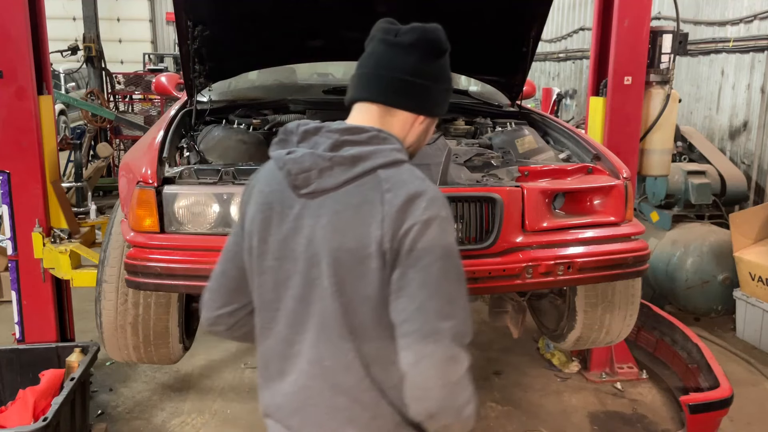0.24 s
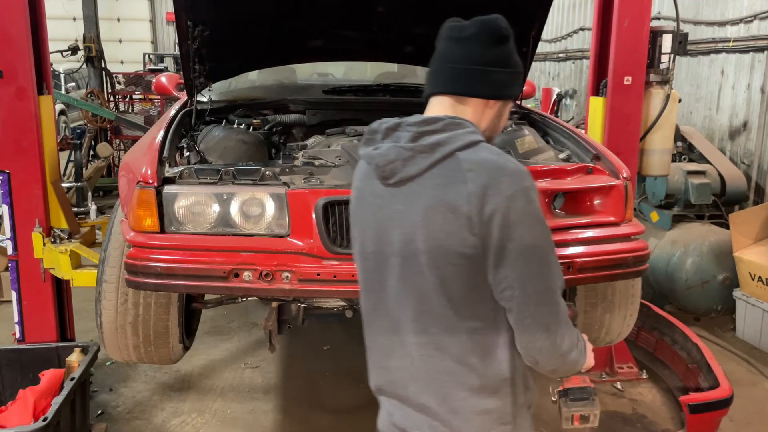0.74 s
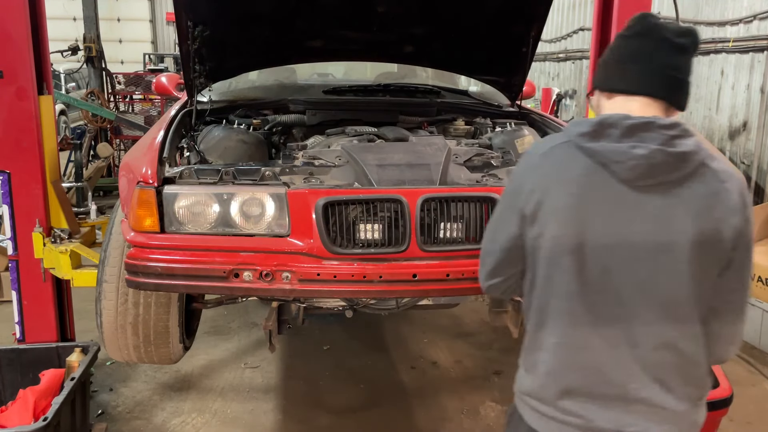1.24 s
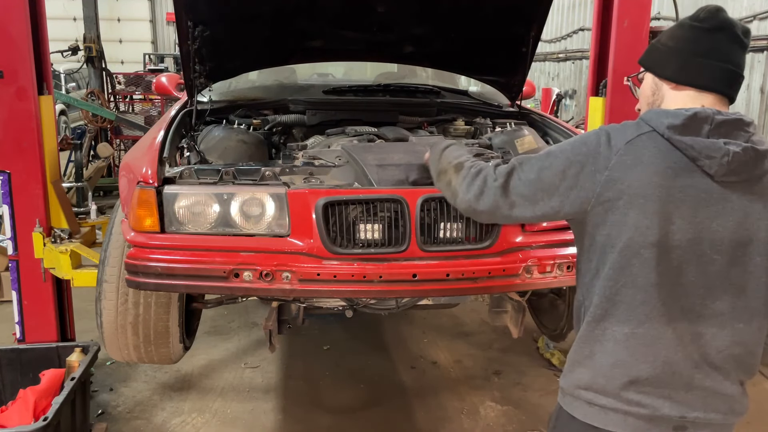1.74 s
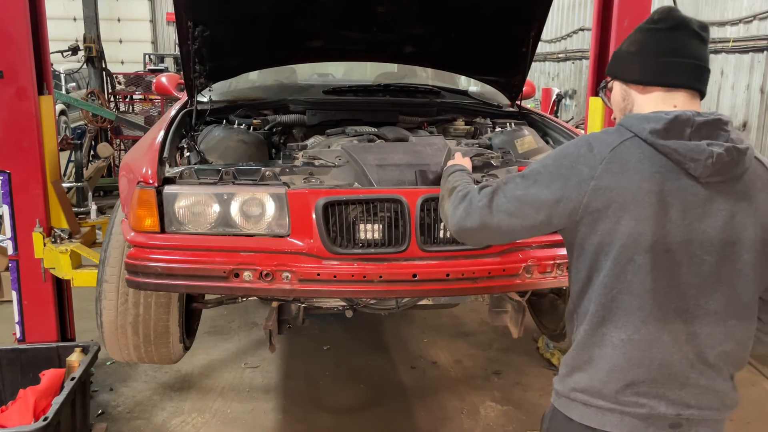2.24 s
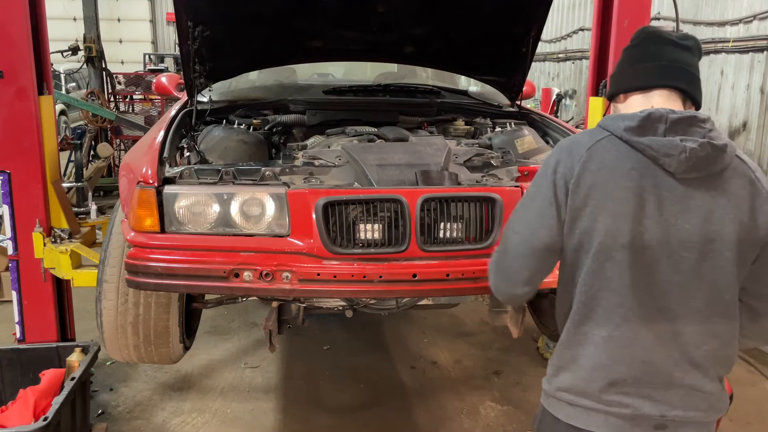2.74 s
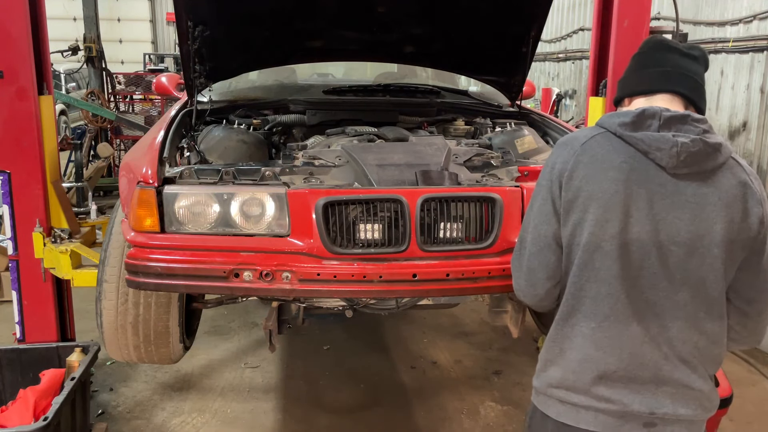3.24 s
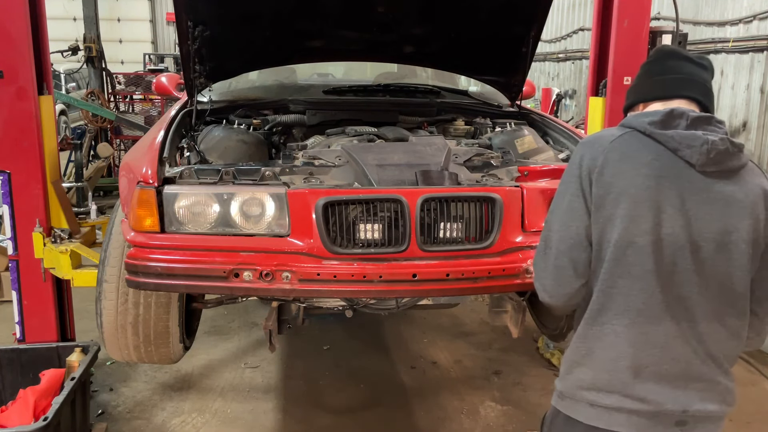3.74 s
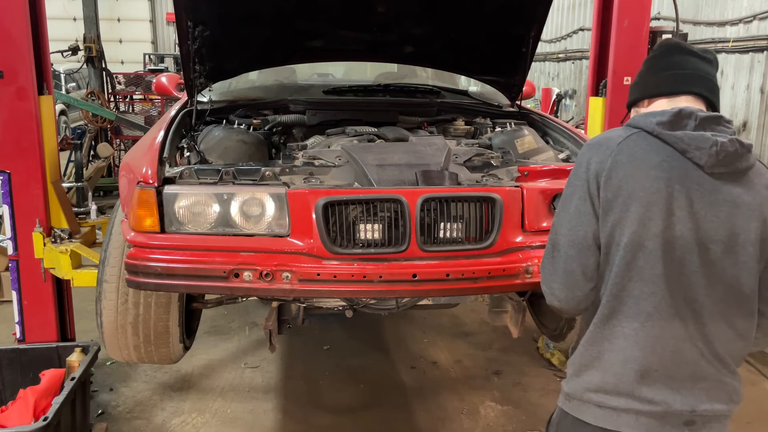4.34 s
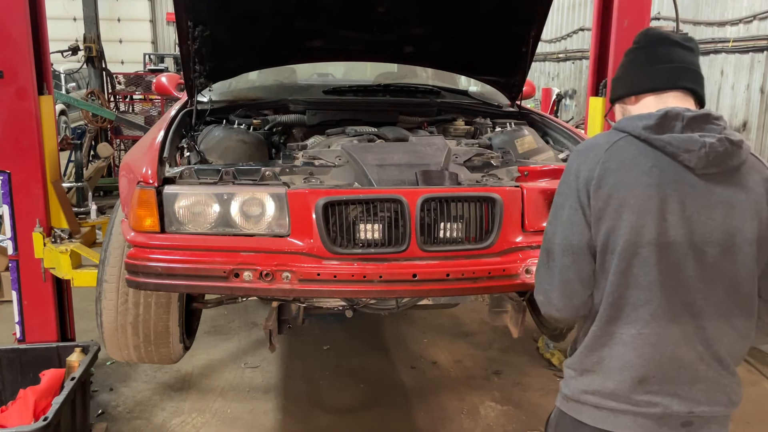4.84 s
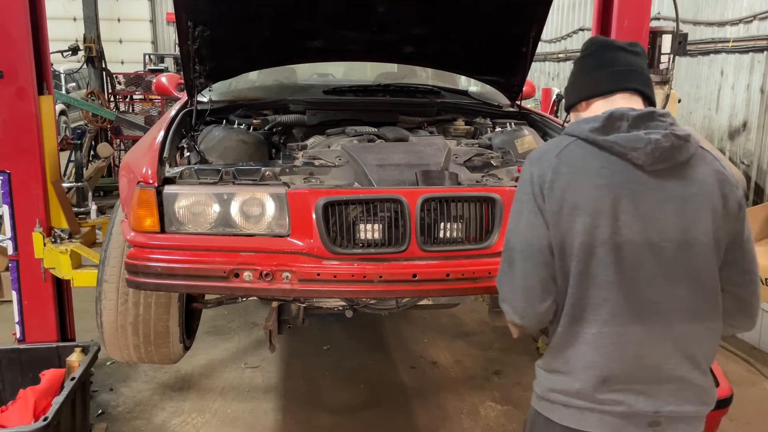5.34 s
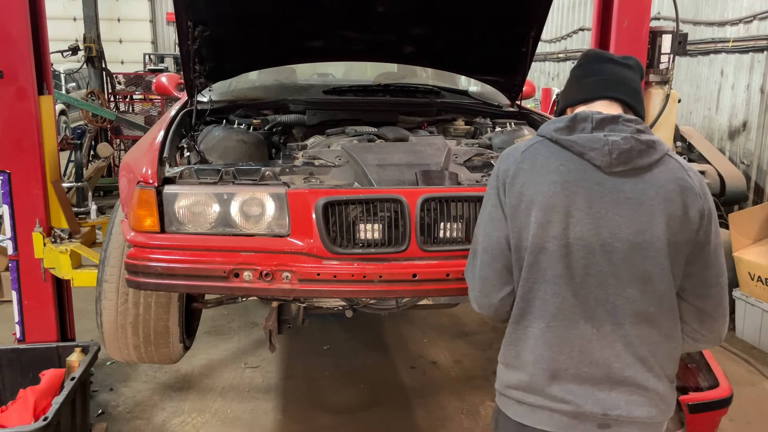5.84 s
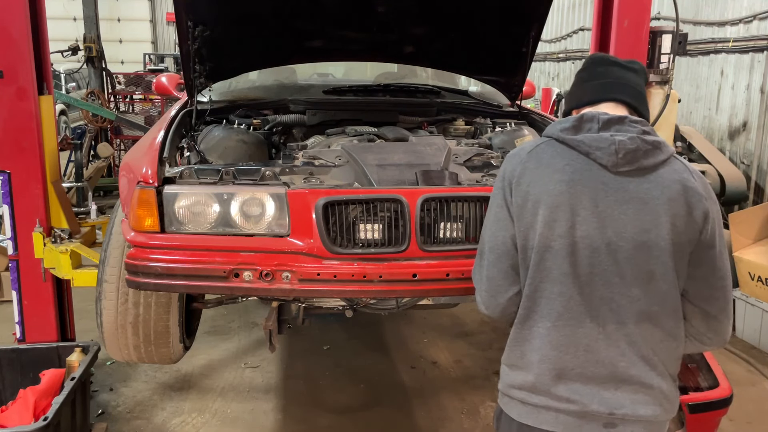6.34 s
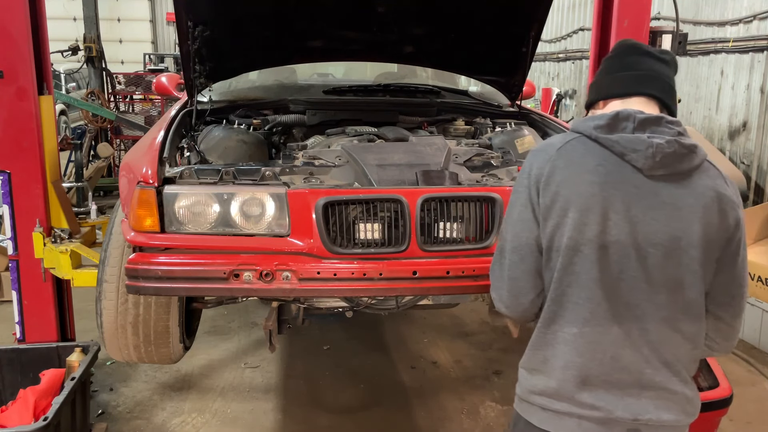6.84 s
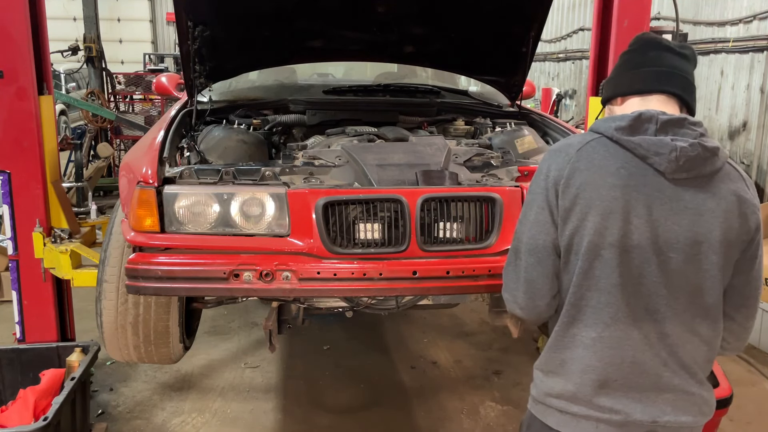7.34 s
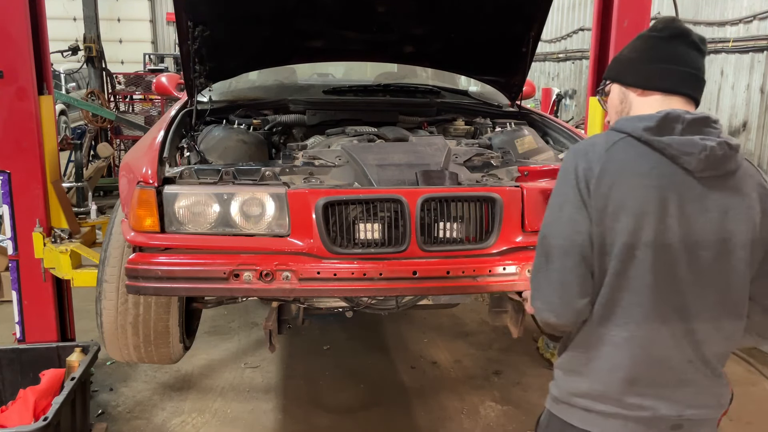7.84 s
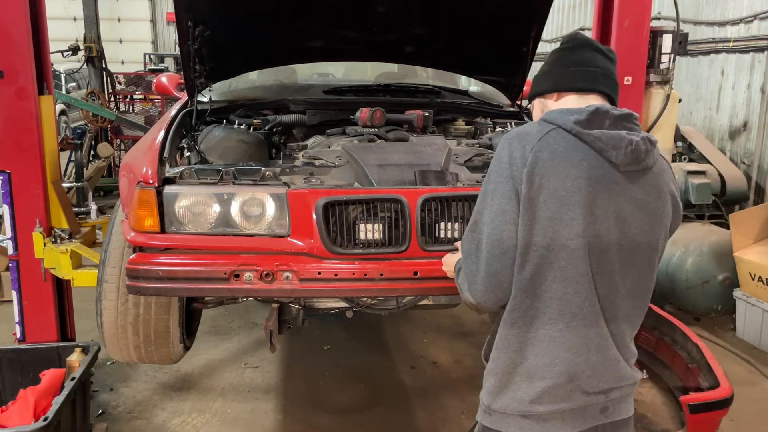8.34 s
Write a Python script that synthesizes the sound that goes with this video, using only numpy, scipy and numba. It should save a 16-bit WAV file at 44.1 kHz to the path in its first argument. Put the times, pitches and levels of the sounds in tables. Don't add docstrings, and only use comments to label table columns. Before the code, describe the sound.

A quiet workshop with hiss, low machine rumble and mains buzz; a metal tool's clink fades at the start. A hollow plastic bang with quick bounces comes first, then lighter knocks and drags, a loud tearing snap, a lull, and a second longer burst of cracking clips and rattles. Faint squeaks and rubbing follow as the machine runs down. Dull phone microphone, moderate room echo.

```python
import sys
import numpy as np
from scipy import signal
from scipy.io import wavfile
from numba import njit

SR = 44100
rng = np.random.default_rng(int(sys.argv[2]) if len(sys.argv) > 2 else 0)


def gain_from_decibels(decibels):
    exponent = np.asarray(decibels, float) / 20
    return 10 ** exponent


def wav_record(signal):
    frames = np.transpose(np.atleast_2d(signal))
    bounded = np.clip(frames, -1, 1)
    quanta = np.round(bounded * 32767).astype(np.int16)
    wavfile.write(sys.argv[1], SR, quanta)


N = 379260

# f/Hz, density/dB per Hz
HISS_SPECTRUM = [
    (150, -4),
    (300, -5),
    (500, -11.5),
    (1500, -14),
    (4000, -17.5),
    (5500, -22.5),
    (7000, -34.5),
    (9000, -51.5),
]
# multiple of the mains pitch, level/dB rms
MAINS_HARMONICS = [(3, -72), (5, -74), (9, -72.5), (10, -76.5), (12, -80), (14, -73.5), (16, -77),
                   (20, -80.5), (23, -74), (1, -82), (28, -81), (30, -82), (35, -80), (2, -75)]
# f/Hz, likeness [0 to 1]
PORT_LIKENESS = [
    (60, 0.93),
    (210, 0.92),
    (750, 0.88),
    (2640, 1),
    (9320, 0.19),
]
# f/Hz, level/dB, t60/s
TOOL_MODES = [
    (1320, -3, 0.33),
    (2300, 1, 0.26),
    (3050, -1, 0.3),
    (3330, 3, .5),
    (3600, 0, 0.3),
]
# f/Hz, t60/s, level/dB
REVERBERATION = [
    (168, 1, 0),
    (525, 0.54, -5),
    (1570, 0.67, -9.5),
    (4600, 0.69, -6.5),
]
# t/s, f/Hz, level/dB, t60/s, hand damps at t/s
BOOMS = [(1.77, 235, -22, 0.064, 2.6), (3.522, 97.4, -41.5, 0.29, 3.6), (4.018, 196, -22, 0.2, 4.3),
         (4.02, 96.4, -43.5, 0.74, 4.4), (5.947, 90, -44.5, 0.35, 6.8), (6.29, 88, -37, 0.55, 6.6),
         (6.7, 86.7, -43, 0.4, 6.9), (6.278, 285, -24, .3, 6.45), (5.945, 250, -33, .3, 6.15),
         (6.7, 288, -26, 0.46, 7.0), (6.761, 130, -44, .5, 8.8), (3.525, 190, -35, .15, 3.65)]
# t/s, f/Hz, level/dB, t60/s, hand damps at t/s
BRACKET_RINGS = [(3.675, 206, -35, .9, 3.93), (3.665, 770, -36, .3, 3.9), (3.665, 1310, -35, .3, 3.9),
                 (3.665, 2200, -38, .28, 3.9), (2.995, 1830, -37, .12, 3.2), (4.449, 1620, -30, .15, 4.6),
                 (6.276, 1600, -17, .1, 6.4), (6.366, 1630, -20, .15, 6.5), (6.744, 1520, -18, .15, 6.9),
                 (2.257, 800, -45, .15, 2.4), (4.02, 3000, -24, .3, 4.2)]
# t/s, length/s, from f/Hz, to f/Hz, level/dB
SQUEAKS = [
    (2.99, .22, 2960, 2880, -54),
    (7.2, .28, 290, 318, -45),
    (4.2, .38, 2800, 2980, -38),
    (4.55, .4, 2950, 2900, -52),
    (6.8, .33, 3800, 3650, -42),
    (6.75, .3, 4700, 4500, -37),
    (7.2, .3, 3000, 3050, -54),
]
# f/Hz, lift/dB
PANEL_MODES = [(200, 4), (310, 4), (545, 5), (770, 3), (1080, 4), (1290, 2.5), (1580, 5), (1850, 2.5),
               (2140, 3), (2480, 2.5), (2950, 3), (3600, 2.5), (4600, 3), (5700, 3)]
# t/s, level/dB, hold/s, release/dB per s, hiss relative level/dB
RIPS = [
    (4.014, -13.5, 0.024, 188.5, -1.5),
    (4.108, -23.5, 0.006, 295, -2),
    (6.273, -21, .012, 300, -2),
    (6.297, -22, 0.09, 301.5, 3),
    (6.41, -28, .03, 202.5, -15),
    (6.664, -26, 0.03, 147.5, 1),
    (6.697, -25, 0.1, 156, 2),
]
# first touch t/s, level/dB, swell/s, hold/s, hiss relative level/dB
SLIDES = [
    (1.431, -44.5, 0.073, 0.07, -14),
    (4.225, -34, 0.13, 0.14, -2.5),
    (4.495, -43.5, 0.058, 0.083, -0.5),
    (4.624, -51, 0.062, 0.22, -12),
    (5.438, -40.5, .012, 0.023, -15),
    (5.521, -54, .03, 0.23, -25),
    (6.537, -32.5, 0.17, 0.076, 1.5),
    (7.049, -42, 0.13, 0.14, -5.5),
    (7.288, -49, 0.13, 0.06, -6),
    (8.3, -59.5, 0.07, 0.19, -8),
]
# t/s, level/dB, thud relative level/dB, hiss relative level/dB
DRAGS = [
    (1.775, -32, -8, -2),
    (2.077, -34.5, -6.5, -16),
    (2.958, -26.5, -16, -9),
    (3.526, -27, -11, -7),
    (3.66, -24.5, -1.5, -7),
    (5.941, -34.5, 3, 10),
]
# t/s, peak level/dB, strongest ring f/Hz,
# crack relative level/dB, thud relative level/dB
BLOWS = [(0.427, -28, 1570, -21, -36), (1.76, -4, 1140, -15, -22), (1.957, -27, 1900, -14, -47),
         (2.071, -18.5, 1240, -22, -18), (2.247, -30.5, 1450, -43, -8), (2.961, -17, 2400, -33, -28),
         (3.521, -13.5, 2600, -5, -23), (3.661, -11.5, 1300, -12.5, -39), (4.013, -2.5, 1660, -20, -26),
         (4.111, -1, 2400, -9, -34.5), (5.446, -38.5, 1190, -4, -27), (5.941, -10, 3600, -11, -4.5),
         (6.278, -3.5, 1500, -19, -11), (6.743, -4.5, 1520, -11, -35), (3.637, -37.5, 1500, -22, -26.5)]
# t/s, peak level/dB, strongest ring f/Hz, crack relative level/dB
BOUNCES = [(1.768, -10.5, 500, -29), (1.792, -33.5, 565, -9), (1.803, -22, 500, -22),
           (1.828, -20, 840, -21), (1.853, -28.5, 1920, -20), (1.875, -45, 894, -10),
           (2.261, -33, 790, -40), (2.954, -18.5, 2170, -36), (2.979, -15, 2400, -25),
           (2.999, -18.5, 1810, -38), (3.673, -19, 620, -22), (4.023, -12, 1650, -28.5),
           (4.047, -9, 4900, -6), (4.054, -11.5, 1701, -1.5), (4.085, -5.5, 2360, -11),
           (4.389, -23.5, 2970, -12), (4.447, -17, 1670, -16), (4.592, -29, 2970, -12),
           (5.953, -13.5, 780, -38), (5.969, -26, 3500, -29.5), (6.298, -7, 1690, -1.5),
           (6.314, -10, 540, 3.5), (6.367, -10, 3100, -9), (6.365, -5, 1703, -19),
           (6.396, -6.5, 2970, -19.5), (6.429, -12, 2590, -13), (6.711, -7, 4400, -13),
           (6.774, -14, 1500, -4.5), (6.783, -11.5, 4610, -12), (8.589, -46, 608, -2)]
# f/Hz, left minus right level/dB
TRIM_PAN = [
    (300, -3),
    (1500, -1),
    (5000, 3),
]

HISS_DB, RUMBLE_DB, DRAUGHT_DB = -59, -61.5, -72
GUST_DB, GUST_ENDS_S = 9, 2.1
MACHINE_STOPS_S, RUN_DOWN_S = 7.33, 0.55
HISS_LOSS_DB, RUMBLE_LOSS_DB, BUZZ_LOSS_DB = 4, 11, 3
MAINS_HZ = 50
CLINK_DB = -50.5
SQUEAK_PEAK_AT = 0.3
RIP_RISE_S, RIP_THUD_DB, RIP_HOLLOW_DB = 0.001, -10, -5.5
SLIDE_RELEASE_DB_PER_S, SLIDE_THUD_DB, SLIDE_HOLLOW_DB = 165, -8, -6.5
DRAG_RELEASE_DB_PER_S, DRAG_HOLLOW_DB = 263, -5
BLOW_RATTLE_MS, BOUNCE_RATTLE_MS = 23, 65
BOUNCE_THUD_DB, THUD_DB_PER_OCTAVE = -13.5, -5
WING_ECHO_S, WING_ECHO_DB = 0.0012, -10
MICROPHONE_OFFSET = 0.0013


def rms_one(x):
    return x / np.sqrt(np.mean(x ** 2) + 1e-20)


def at_hz(points, hz):
    table_hz, values = np.array(points).T
    return np.interp(np.log(hz), np.log(table_hz), values)


def band(x, low, high, order=2):
    return signal.sosfilt(signal.butter(order, [low, high], "band", fs=SR, output="sos"), x)


def drift(rate):
    r = np.exp(-80 * np.pi * rate / SR)
    noise = rng.standard_normal(N // 40 + 2002)
    slow = rms_one(signal.lfilter([1], [1, -2 * r, r * r], noise)[2000:])
    return np.interp(np.arange(N) / 40, np.arange(len(slow)), slow)


def resonate(x, hz, width_hz):
    r = np.exp(-np.pi * width_hz / SR)
    zeros = np.array([1, 0, -1]) * (1 - r * r) / 2
    return signal.lfilter(zeros, [1, -2 * r * np.cos(2 * np.pi * hz / SR), r * r], x)


def lift(x, hz, width_hz, db):
    return x + (gain_from_decibels(db) - 1) * resonate(x, hz, width_hz)


def stereo_band(low, high):
    mid, side = band(rng.standard_normal((2, N)), low, high)
    alike = at_hz(PORT_LIKENESS, np.sqrt(low * high))
    return rms_one(np.sqrt(1 + alike) * mid + np.sqrt(1 - alike) * side * [[1], [-1]])


def background():
    t = np.arange(N) / SR
    stopped = np.clip((t - MACHINE_STOPS_S) / RUN_DOWN_S, 0, 1)
    gust_db = GUST_DB * np.clip((GUST_ENDS_S - t) / 0.27, 0, 1)
    hiss = 0
    edges = 150 * 2 ** np.arange(0, 6.1, 0.5)
    for low, high in zip(edges, edges[1:]):
        density_db = at_hz(HISS_SPECTRUM, np.sqrt(low * high)) + 1.1 * drift(11)
        hiss = hiss + gain_from_decibels(density_db) * np.sqrt(high - low) * stereo_band(low, high)
    hiss = gain_from_decibels(HISS_DB - HISS_LOSS_DB * stopped) * rms_one(hiss)
    rumble_db = RUMBLE_DB - RUMBLE_LOSS_DB * stopped + 0.6 * drift(4.3)
    rumble = gain_from_decibels(rumble_db) * stereo_band(86, 125)
    draught_db = DRAUGHT_DB + gust_db - RUMBLE_LOSS_DB * stopped + 0.6 * drift(5)
    draught = gain_from_decibels(draught_db) * stereo_band(46, 75)
    buzz = 0
    for multiple, db in MAINS_HARMONICS:
        phase = 2 * np.pi * (MAINS_HZ * multiple * t + rng.random())
        buzz = buzz + gain_from_decibels(db + 3) * np.sin(phase)
    return hiss + rumble + draught + gain_from_decibels(1.1 - BUZZ_LOSS_DB * stopped) * buzz


def clink():
    t, noise = np.arange(N) / SR, rng.standard_normal(N)
    out = gain_from_decibels(3.5 - 60 * t / 0.49) * rms_one(band(noise, 360, 2700))
    for hz, db, t60 in TOOL_MODES:
        out += gain_from_decibels(db - 60 * t / t60) * rms_one(resonate(noise, hz, 73))
    return gain_from_decibels(CLINK_DB) * out


def shop(x):
    t = np.arange(SR) / SR
    onset = np.clip((t - 0.006) / 0.0058, 0, 1)
    tail = np.zeros((2, SR))
    for hz, t60, db in REVERBERATION:
        shared, own = rng.standard_normal(SR), rng.standard_normal((2, SR))
        noise = (0.31 + 300 / hz) * shared + own
        part = band(noise, hz / 2.24, hz * 1.26) * gain_from_decibels(-60 * t / t60) * onset
        energy = np.sum(part ** 2) / 2
        tail += gain_from_decibels(db) * part / np.sqrt(energy / (hz * 0.98 / SR))
    return signal.fftconvolve(x[None], tail, axes=1)[:, :N]


def dying(s, hz, db, t60, rise_s):
    t = np.maximum(np.arange(N) / SR - s, 0)
    return gain_from_decibels(db - 60 * t / t60) * np.sin(2 * np.pi * hz * t) * (1 - np.exp(-t / rise_s))


def cavity():
    t, out = np.arange(N) / SR, np.zeros(N)
    for s, hz, db, t60, damped_at in [*BOOMS, *BRACKET_RINGS]:
        out += dying(s, hz, db, t60, 0.0013) * np.clip((damped_at - t) / 0.021, 0, 1)
    return out


@njit
def gliding(x, cosine, r):
    y = np.zeros(len(x))
    for i in range(2, len(x)):
        y[i] = x[i] - x[i - 2] + 2 * r * cosine[i] * y[i - 1] - r * r * y[i - 2]
    return y


def squeaks():
    out, t = np.zeros(N), np.arange(N) / SR
    for s, length_s, from_hz, to_hz, db in SQUEAKS:
        done = (t - s) / length_s
        hz = from_hz + (to_hz - from_hz) * np.clip(done, 0, 1)
        shape = np.interp(done, [0, SQUEAK_PEAK_AT, 1], [0, 1, 0])
        force = rng.standard_normal(N) * gain_from_decibels(3.5 * drift(30))
        r = np.exp(-np.pi * (40 + 0.025 * from_hz) / SR)
        tone = rms_one(gliding(force, np.cos(2 * np.pi * hz / SR), r))
        out += tone * gain_from_decibels(db) * shape
    return out


def grains(count, per_s, spread_db):
    sizes = gain_from_decibels(spread_db * np.minimum(rng.exponential(1, count), 4)) * rng.choice([-1, 1], count)
    return sizes * (rng.random(count) < per_s / SR) + 1e-9


def panel(force, scatter_db, edges):
    scatter = scatter_db * rng.standard_normal(len(PANEL_MODES))
    for (hz, db), own_db in zip(PANEL_MODES, scatter):
        force = lift(force, hz, 30 + 0.06 * hz, db + own_db)
    return [band(force, low, high) for low, high in zip(edges, edges[1:])]


def stroke(s, db, rise_s, hold_s, release_db_per_s, slowing):
    t = np.arange(N) / SR - s
    after = np.maximum(t - rise_s - hold_s, 0)
    release_db = release_db_per_s * after / np.sqrt(1 + slowing * after)
    return np.clip(t / rise_s, 0, 1) * gain_from_decibels(db - release_db)


def rubbing():
    force = grains(N, 9000, 1.84) * gain_from_decibels(1.22 * drift(20))
    thud, hollow, body, hiss = map(rms_one, panel(force, 0, (170, 500, 1300, 3000, 6200)))
    strokes = []
    for s, db, hold_s, release, hiss_db in RIPS:
        touch = stroke(s, db, RIP_RISE_S, hold_s, release, 2.5)
        strokes.append((touch, RIP_THUD_DB, RIP_HOLLOW_DB, hiss_db))
    for s, db, swell_s, hold_s, hiss_db in SLIDES:
        touch = stroke(s, db, swell_s, hold_s, SLIDE_RELEASE_DB_PER_S, 0)
        strokes.append((touch, SLIDE_THUD_DB, SLIDE_HOLLOW_DB, hiss_db))
    for s, db, thud_db, hiss_db in DRAGS:
        touch = stroke(s, db, RIP_RISE_S, 0, DRAG_RELEASE_DB_PER_S, 6.3)
        strokes.append((touch, thud_db, DRAG_HOLLOW_DB, hiss_db))
    out = np.zeros((3, N))
    for touch, thud_db, hollow_db, hiss_db in strokes:
        ranges = [thud * gain_from_decibels(thud_db), body - hollow * gain_from_decibels(hollow_db), -hiss * gain_from_decibels(hiss_db)]
        out += touch * gain_from_decibels(-6.5) * np.array(ranges)
    return out


def blows(table, t60_ms, snap_db, rise_s, ring_share):
    size = SR // 4
    t, out = np.arange(size) / SR, np.zeros((3, N + size))
    rattle_shape = gain_from_decibels(-60e3 * t / t60_ms) * np.minimum(t / rise_s, 1)
    for s, db, ring_hz, crack_db, thud_db in table:
        force = rms_one(grains(size, 14000, 0.61)) * rattle_shape
        force[30] += gain_from_decibels(snap_db)
        thud, body, crack = panel(force, 2, (160, 500, 3000, 6200))
        body = lift(body, ring_hz, ring_share * ring_hz, 14)
        body = band(body, 300, 1200 + 1.6 * ring_hz, order=1)
        at = max(round(s * SR) - 40, 0)
        parts = [(thud, thud_db - 2.5), (-body, -3), (crack, crack_db + 0.5)]
        for row, (part, level_db) in enumerate(parts):
            out[row, at:at + size] += gain_from_decibels(db + level_db) * part / np.abs(part).max()
    return out[:, :N]


def scene():
    bounces = []
    for s, db, hz, crack_db in BOUNCES:
        thud_db = BOUNCE_THUD_DB + THUD_DB_PER_OCTAVE * np.log2(hz / 1000)
        bounces.append((s, db, hz, crack_db, thud_db))
    trim = blows(BLOWS, BLOW_RATTLE_MS, snap_db=16, rise_s=0.0012, ring_share=0.4)
    trim += blows(bounces, BOUNCE_RATTLE_MS, snap_db=3, rise_s=0.005, ring_share=0.2)
    trim += rubbing()
    trim[0] += cavity()
    trim[2] += squeaks()
    pan_db = np.array(TRIM_PAN)[:, 1] / 2
    direct = np.array([gain_from_decibels(pan_db) @ trim, gain_from_decibels(-pan_db) @ trim])
    direct[1] = 0.8 * direct[1] + 0.25 * np.roll(direct[1], 6)
    reflected = np.roll(trim[1] + trim[2], round(WING_ECHO_S * SR))
    echo = gain_from_decibels(WING_ECHO_DB) * reflected * [[1], [-1]]
    return direct + echo + shop(trim.sum(axis=0)) + clink() + background()


def band_limit(x):
    return signal.sosfilt(signal.butter(12, 9920, fs=SR, output="sos"), x)


def record(dry):
    steep_top = signal.sosfilt(signal.cheby2(10, 40, 10000, fs=SR, output="sos"), dry)
    dull = signal.sosfilt(signal.butter(4, 6300, fs=SR, output="sos"), steep_top)
    mix = 1.032 * np.tanh(dull / 1.057) + MICROPHONE_OFFSET
    return band_limit(mix)


dry = scene()
out = record(dry)
wav_record(out)
```